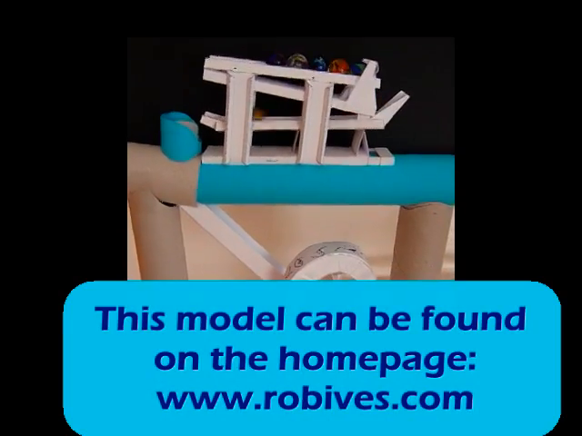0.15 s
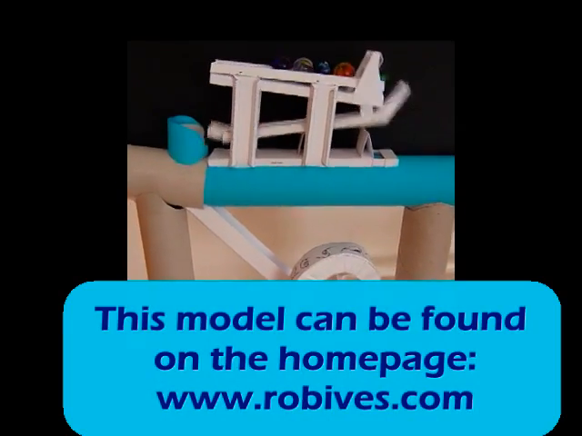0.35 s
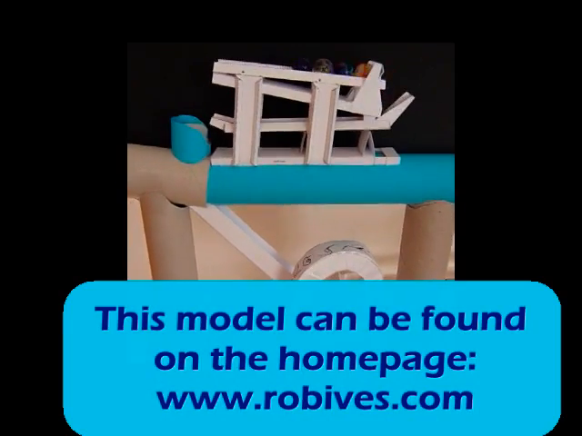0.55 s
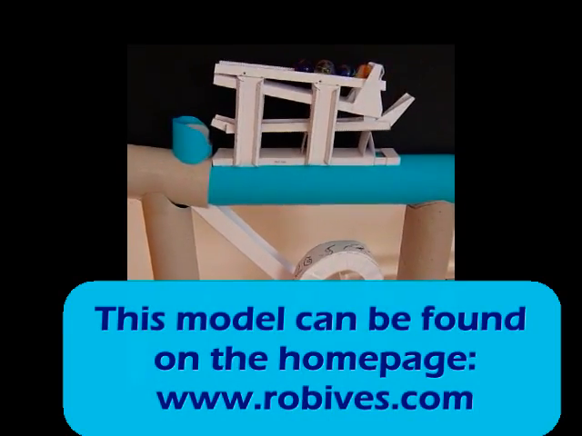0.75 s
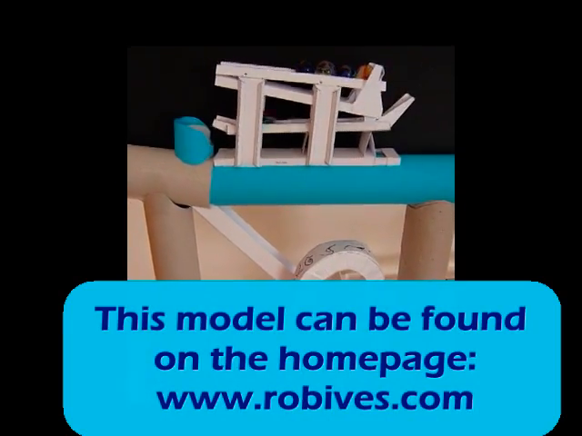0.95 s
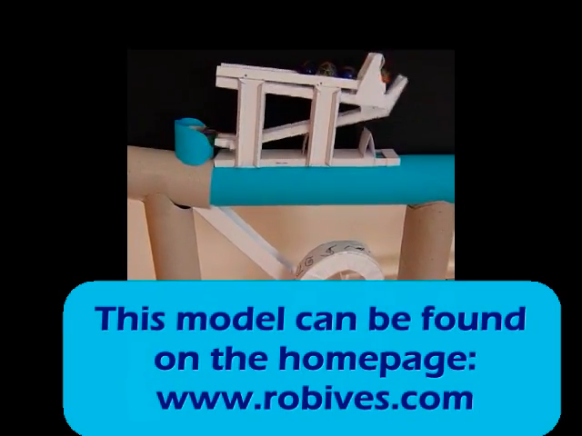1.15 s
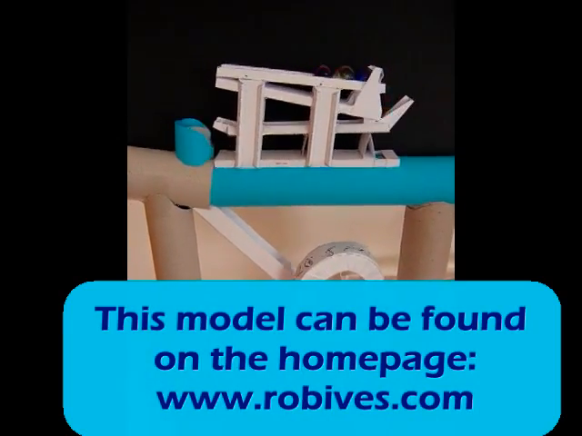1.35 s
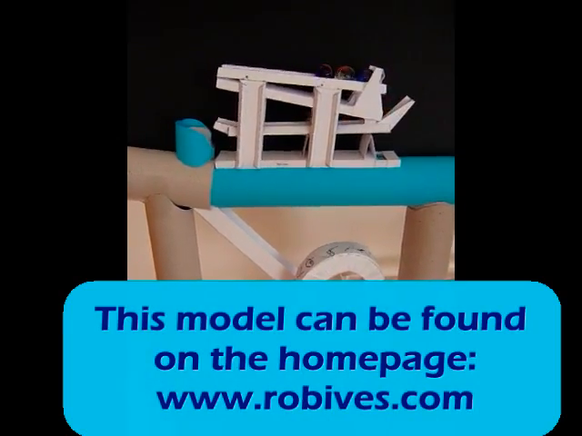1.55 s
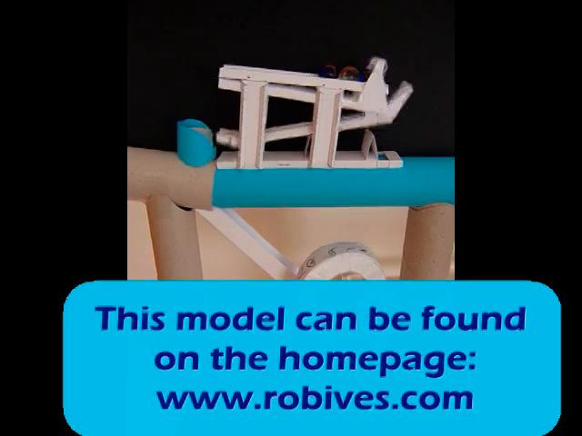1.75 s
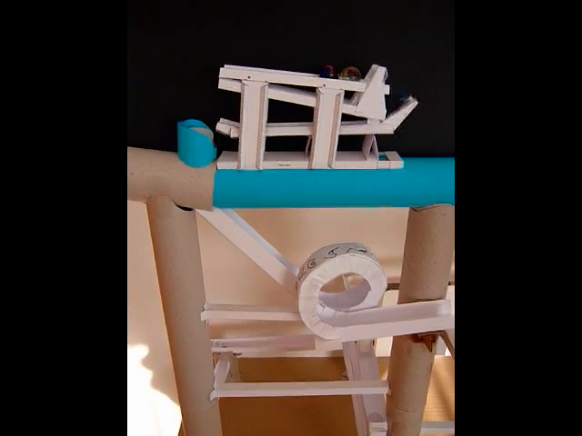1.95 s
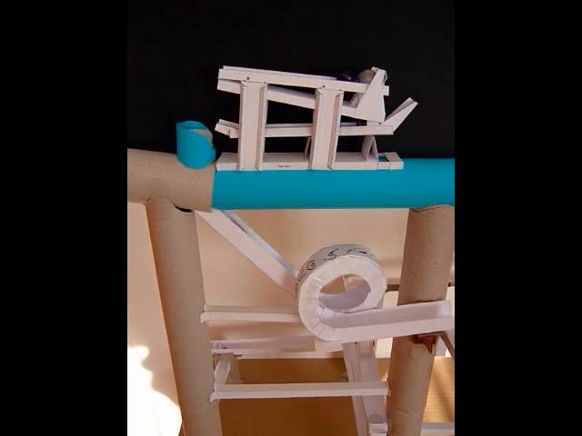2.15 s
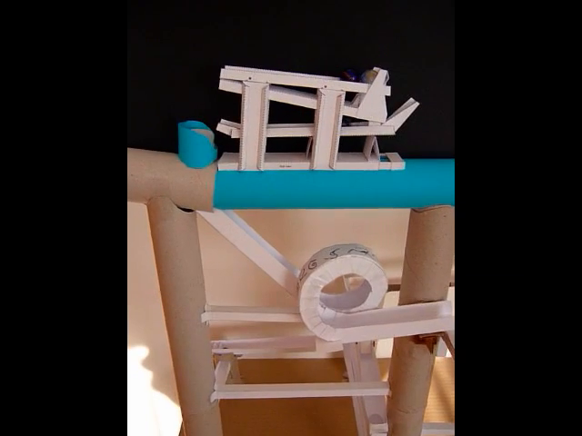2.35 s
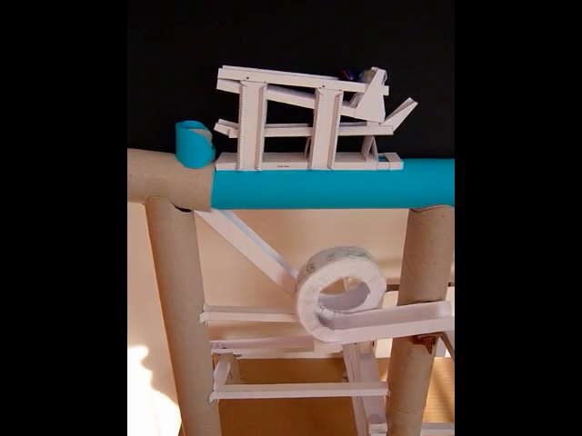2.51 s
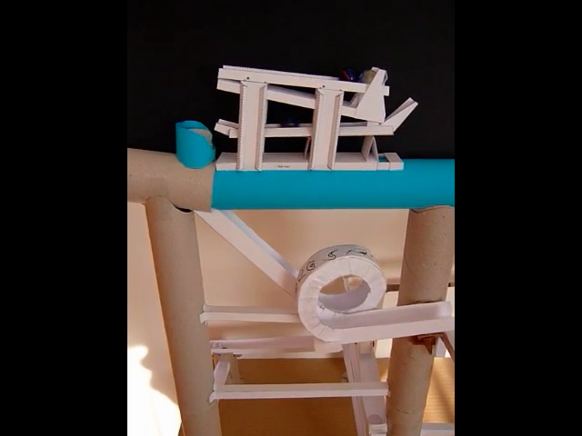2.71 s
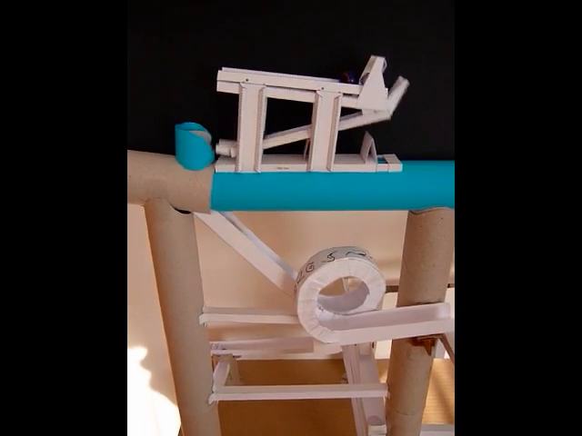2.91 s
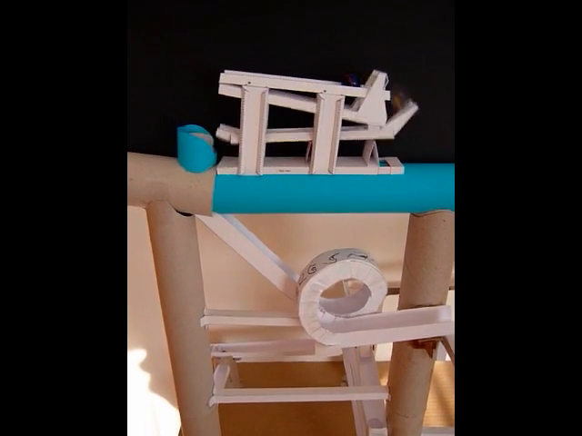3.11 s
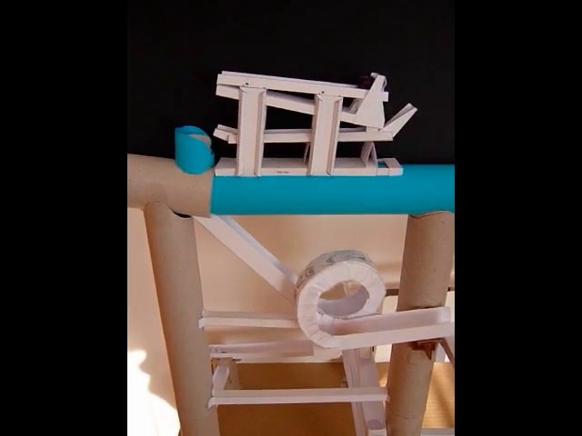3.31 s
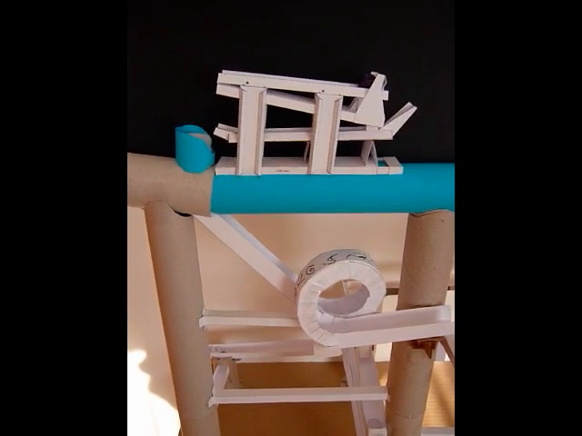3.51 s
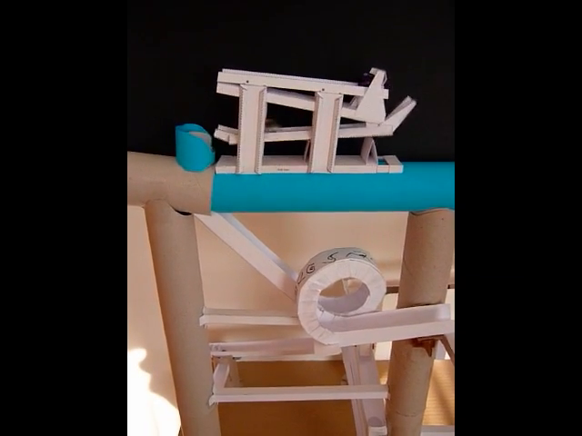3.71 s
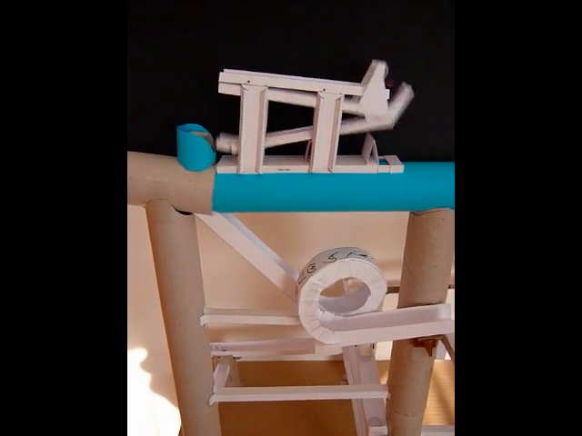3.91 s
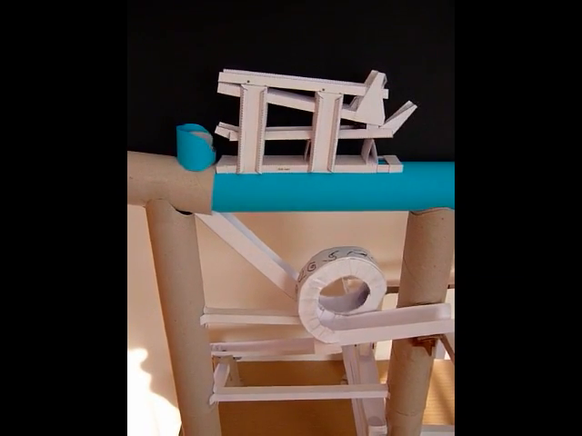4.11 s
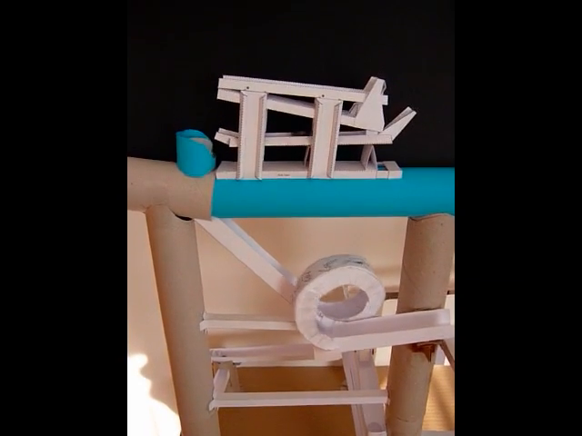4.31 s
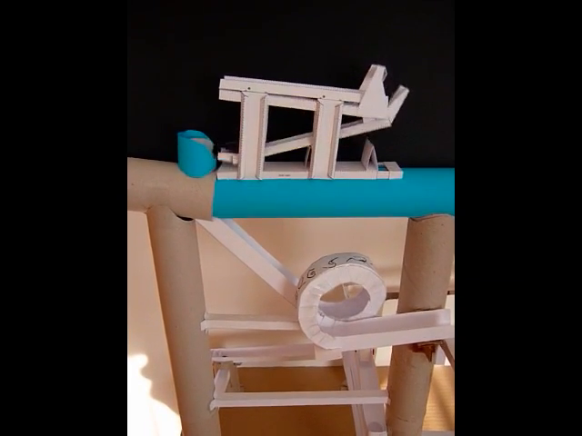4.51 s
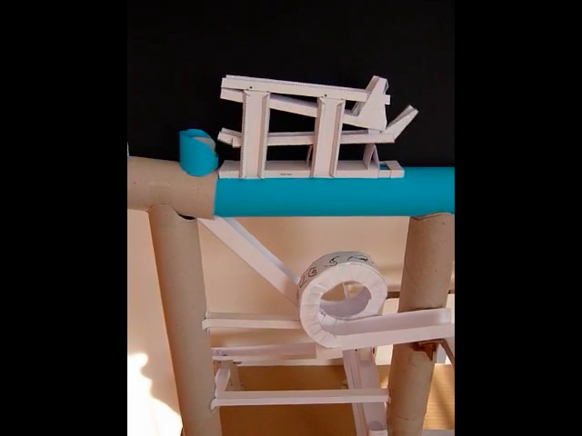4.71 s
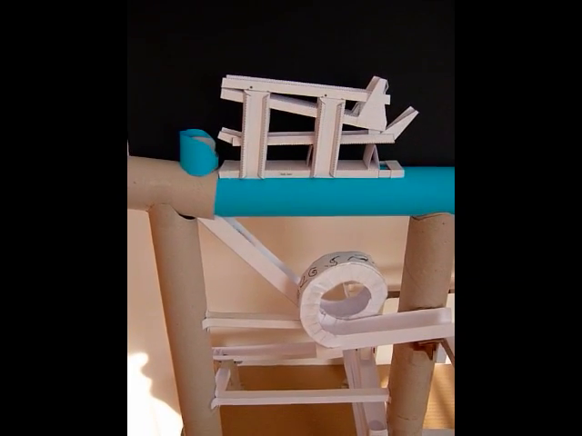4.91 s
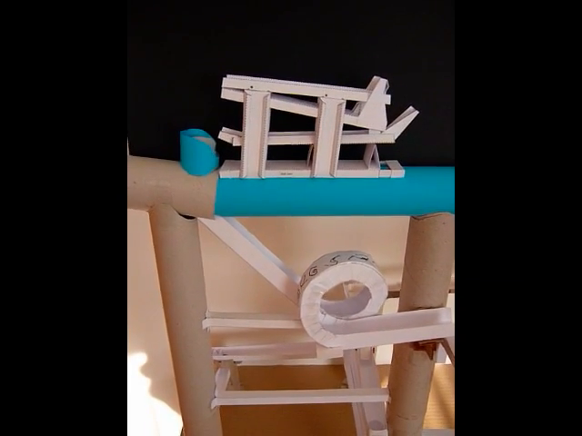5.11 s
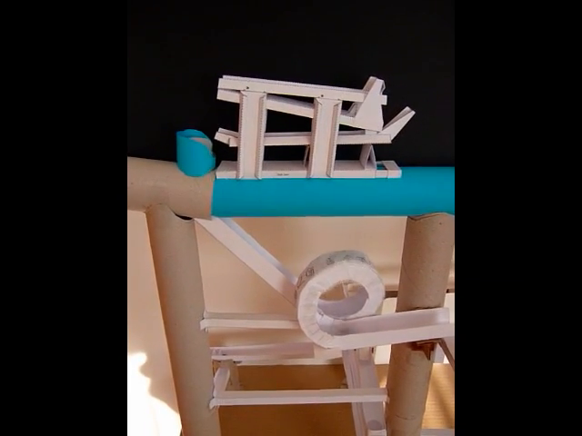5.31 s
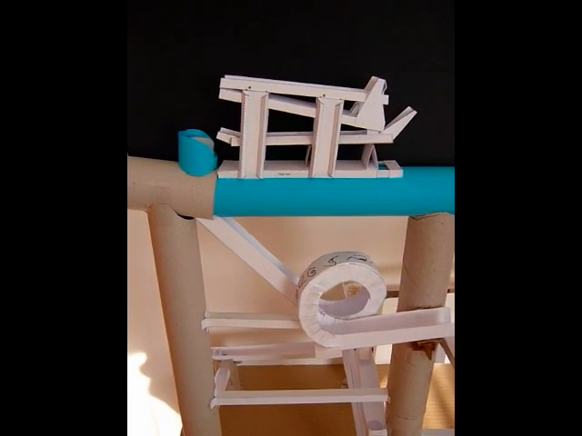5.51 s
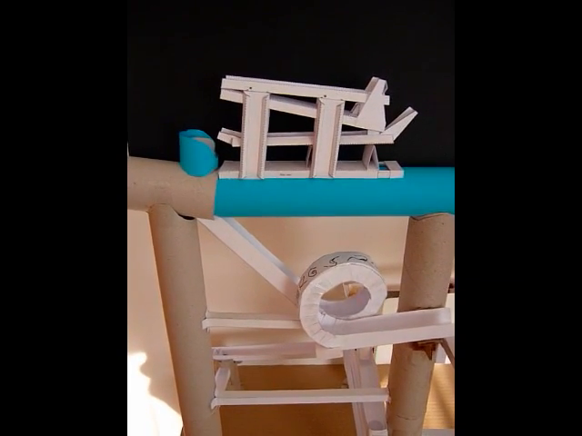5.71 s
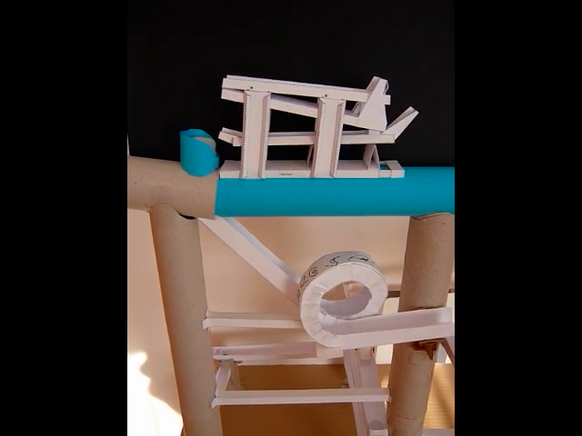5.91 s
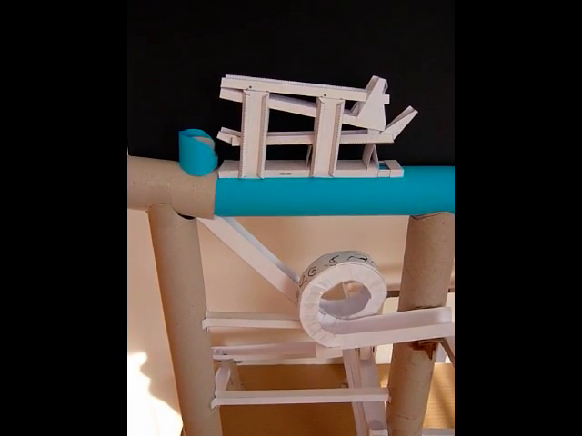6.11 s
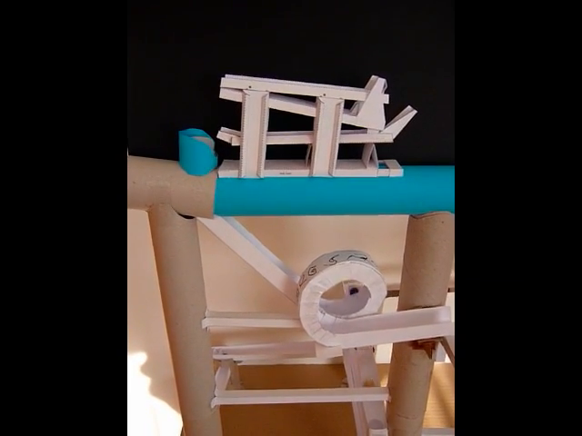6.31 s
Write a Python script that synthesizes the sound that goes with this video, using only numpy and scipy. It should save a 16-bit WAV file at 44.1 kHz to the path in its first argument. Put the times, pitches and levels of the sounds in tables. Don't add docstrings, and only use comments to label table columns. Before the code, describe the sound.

A dense, irregular patter of small dry impacts: marbles knocking a light seesaw arm, skidding into bends, clacking on stiff paper rails and bumping in hollow cardboard tubes. Hard slams and snaps stand out in the middle, with another thick cluster later, then thinning taps. Close, mostly mono pickup, short indoor echoes, soft background hiss and slightly rough digital treble.

```python
import sys
import numpy as np
from scipy import signal
from scipy.fft import rfft, irfft
from scipy.io import wavfile
from scipy.ndimage import uniform_filter1d

SR = 44100
rng = np.random.default_rng(int(sys.argv[2]) if len(sys.argv) > 2 else 0)


def master_out(mix):
    frames = np.transpose(np.atleast_2d(mix))
    ceiling = np.clip(frames, -1, 1)
    pcm = np.round(ceiling * 32767).astype(np.int16)
    wavfile.write(sys.argv[1], SR, pcm)


def makeup_ratio(level_db):
    decades = np.asarray(level_db, float) / 20
    return 10 ** decades


N = 280035


def evened(x):
    return x / np.sqrt(np.mean(x ** 2) + 1e-20)


def read(points, hz):
    f, value = np.transpose(points)
    return np.interp(np.log(hz + 1), np.log(f + 1), value)


def add(mix, s, sound):
    part = mix[..., round(s * SR):][..., :sound.shape[-1]]
    part += sound[..., :part.shape[-1]]


def colour(points, modes=()):
    hz = abs(np.fft.fftfreq(8192, 1 / SR))
    gain = makeup_ratio(np.maximum(read(points, hz), -90))
    lift = 1
    for mode_hz, width_hz, db in modes:
        lift = lift + 2.9 * makeup_ratio(db) / np.sqrt(1 + (2 * (hz - mode_hz) / width_hz) ** 2)
    log_spectrum = np.conj(signal.hilbert(np.log(gain * lift)))
    taps = np.fft.ifft(np.exp(log_spectrum)).real[:4096]
    return taps / np.linalg.norm(taps)


def ring(x, hz, width_hz):
    r = np.exp(-np.pi * width_hz / SR)
    return signal.lfilter([1, 0, -1], [1, -2 * r * np.cos(2 * np.pi * hz / SR), r * r], x)


def contacts(count, per_s, spread_db):
    chance, size, sign = rng.random((count, 3)).T
    size_db = spread_db * np.minimum(-np.log(size + 1e-9), 4)
    return evened((chance < per_s / SR) * makeup_ratio(size_db) * np.sign(sign - 0.5))


# (frequency [Hz], density [dB per Hz])
HUSH = [(20, -38), (60, -13), (120, 3.5), (220, 8.5), (700, 3), (1600, -2), (3000, -11), (6000, -15),
        (8000, -24), (10000, -29), (14000, -13.5)]
# (frequency [Hz], level [dB])
WHINES = [(7364, -76), (8635, -75)]


def hush():
    hz, t = np.fft.rfftfreq(N, 1 / SR), np.arange(N) / SR
    spectrum = rfft(rng.standard_normal(N)) * makeup_ratio(read(HUSH, hz))
    noise = makeup_ratio(-47.5) * evened(irfft(spectrum, N))
    for whine_hz, db in WHINES:
        noise = noise + np.sqrt(2) * makeup_ratio(db) * np.sin(2 * np.pi * whine_hz * t)
    return noise


# (frequency [Hz], 60 dB decay time [s])
ROOM = [(150, 0.7), (500, 0.33), (1500, 0.42), (4000, 0.043), (10000, 0.26)]


def room(x):
    taps = np.zeros(SR // 2)
    at = np.arange(200, len(taps) - 20, 20)
    taps[at + rng.integers(0, 20, len(at))] = rng.choice([-1., 1.], len(at))
    hz, t, z = signal.stft(taps, SR, nperseg=256)
    decay = makeup_ratio(-60 * t / read(ROOM, hz)[:, None])
    tail = signal.istft(z * decay, SR, nperseg=256)[1]
    return signal.fftconvolve(x, tail / np.linalg.norm(tail))[:N]


# (frequency [Hz], width [Hz], lift [dB])
BASE_MODES = [(221, 43, 3.7)]
# (frequency [Hz], level [dB])
BASE_COLOUR = [(40, -52), (70, -24), (110, -16.5), (170, -8), (240, -9.5), (300, -13), (600, -78)]
# (frequency [Hz], width [Hz], lift [dB])
TUBE_MODES = [(376, 35, 3.5), (511, 51, 10)]
# (frequency [Hz], level [dB])
TUBE_COLOUR = [(150, -32), (260, -23), (330, 2), (600, -10), (800, -12.5), (1200, -33), (2000, -119)]
# (frequency [Hz], density [dB per Hz])
PANEL_COLOUR = [(350, -31.5), (600, -3), (981, -3), (1290, -4.5), (1450, -1.5), (2070, -5.5), (2610, -5.5),
                (2820, -4), (4000, -9.5), (5200, -28), (8800, -120)]
# (frequency [Hz], density [dB per Hz])
PAPER_COLOUR = [(1880, -7), (3200, -19.5), (3620, -9.5), (4590, -1), (6190, -2.5), (8010, -16), (9860, -9),
                (10900, -12.5), (12200, -11.5), (12900, -11), (13800, -53)]


def bodies(drive):
    base = colour(BASE_COLOUR, BASE_MODES)
    tubes = colour(TUBE_COLOUR, TUBE_MODES)
    responses = np.array([base, tubes, colour(PANEL_COLOUR), colour(PAPER_COLOUR)])
    return signal.oaconvolve(drive, responses, axes=1)[:, :N].sum(0)


# (time [s], peak level [dB])
TICKS = [(0.307, -32), (0.419, -40), (0.8854, -36.5), (1.27, -33), (1.4543, -21), (1.8482, -16),
         (2.0787, -22), (2.782, -21), (3.0932, -26), (3.364, -14.5), (4.018, -24), (4.0437, -33),
         (4.3206, -32), (4.5928, -12.5), (4.8437, -16.5), (4.908, -28), (6.154, -26.5), (6.333, -15.5)]


def ticks():
    out, t = np.zeros(N), np.arange(600) / SR
    glass_hz, width_hz = 6900, 4500
    for s, db in TICKS:
        first = np.exp(-t / 0.0007)
        rebound = 1.6 * (t > 0.002) * np.exp(-t / 0.0016)
        touch = contacts(len(t), 12000, 2.1) * (first + rebound)
        bright = ring(ring(touch, glass_hz, width_hz), glass_hz, width_hz)
        add(out, s, makeup_ratio(db - 3.5) * bright / abs(bright).max())
    return out


# (start [s], length [s], panel level [dB], tube share [dB])
RUNS = [(0, 0.059, -47, 3), (.25, 0.12, -40.5, -6), (0.463, 0.067, -25.5, -9), (.76, 0.14, -71, -34),
        (1.062, 0.23, -36.5, -3.5), (1.198, 0.15, -30, -14), (1.365, 0.1, -37, 3.5),
        (1.477, 0.358, -36.5, -17), (1.938, .11, -23.5, -7), (2.12, 0.053, -35.5, 5.5),
        (2.242, 0.091, -33, -10), (2.514, 0.17, -37.5, -4), (2.742, 0.35, -33, -1.5),
        (3.08, 0.18, -32, -7.5), (3.28, 0.15, -32.5, 7.5), (3.515, 0.29, -42, 4), (3.818, 0.11, -50.5, 16),
        (3.943, 0.15, -29, 2), (4.164, 0.066, -50, 20.5), (4.302, 0.16, -37, -5), (4.5, 0.052, -37, 4.5),
        (4.573, 0.2, -30.5, -4), (4.863, 0.19, -33.5, -3.5), (5.054, 0.23, -50, 4),
        (5.25, 0.22, -40.5, 12.5), (5.315, 0.17, -33, 6), (5.545, 0.068, -60, 14), (5.668, 0.08, -35.5, -4),
        (5.768, 0.21, -41.5, 14), (6.09, 0.21, -35, -1.5)]


def rolling():
    t, power = np.arange(N) / SR, np.zeros((4, N))
    rise_s, fade_db_per_s = 0.032, 180
    for start, length, db, tube_db in RUNS:
        overrun_s = np.maximum(t - start - length, 0)
        shape = np.clip((t - start) / rise_s, 0, 1) * makeup_ratio(db - fade_db_per_s * overrun_s)
        base_db = -2 + 0.53 * tube_db
        paper_db = -11 - 0.1 * (db + 42) - 0.18 * tube_db
        shares = makeup_ratio(np.array([base_db, tube_db, 0, paper_db]))
        power += np.outer(shares ** 2, shape ** 2)
    slow = uniform_filter1d(uniform_filter1d(rng.standard_normal(N), 400), 400)
    lumps_db = 3.84 * evened(slow)
    return contacts(N, 6000, 4.2) * makeup_ratio(lumps_db - 5.5) * np.sqrt(power)


def land(drive, rows, panel_hz, ring_share, chatter_s):
    t = np.arange(4000) / SR
    for s, db, tube_db, paper_db in rows:
        hold = 1 / (1 + (t / max(chatter_s, 0.002)) ** 2.26)
        touch = contacts(len(t), 5000, 4.18)
        touch[2] = 3.8
        touch /= np.sqrt(np.sum((touch * hold) ** 2) / np.sum(hold ** 2))
        settle = 0.18 * np.exp(-t / 0.16)
        chatter = touch * (hold + settle)
        energy = np.linalg.norm(chatter)

        base = makeup_ratio(0.34 * tube_db - 3.0) * chatter
        thump = 0.7 * chatter + 0.7 * np.exp(-t / 0.00049)
        panel = ring(touch * hold, panel_hz, 40 + 0.12 * panel_hz)
        panel *= ring_share * energy / np.linalg.norm(panel)
        soft_hz = max(6500 * makeup_ratio(paper_db + 3.0), 700)
        body = signal.lfilter([1], [1, -np.exp(-2 * np.pi * soft_hz / SR)], chatter)
        body *= 0.55 * energy / np.linalg.norm(body)
        crisp = chatter * (1 + 1.1 * np.exp(-t / 0.0029))

        forces = np.array([base, makeup_ratio(tube_db) * thump, body + panel, makeup_ratio(paper_db) * crisp])
        add(drive, s, makeup_ratio(db - 15.0) * forces)


# (time [s], panel peak [dB], tube share [dB], surface share [dB])
KNOCKS = [(.267, -28.5, -17, -6), (.378, -13.5, 11, -21.5), (.482, -12.5, 7, -7.5), (.501, -15.5, -30, -7),
          (.599, -33, 3, -18), (.639, -45, -5, 9), (1.054, -31, 0, -9), (1.207, -32, -23, -19),
          (1.227, -17, 8, -10), (1.404, -16, 3, -32), (1.493, -33, -12, -1), (1.615, -20, -6, -10),
          (2.117, -11.5, -4, -18), (2.177, -15, 1, -11), (2.782, -15, -8, -8.5), (4.098, -23.5, -18, -10),
          (4.15, -11.5, 0, -14), (4.215, -22.5, -4, -13), (4.251, -26, -7, -31), (4.321, -22.5, 4.5, -3),
          (4.585, -16, -4, -9), (4.673, -10.5, 3, -8), (4.831, -10, 2.5, -15), (5.805, -25.5, -15, -11),
          (6.008, -12.5, 0, -7.5), (6.296, -41.5, 22, 2), (6.34, -31, -21, -7)]
# (time [s], panel peak [dB], tube share [dB], surface share [dB])
DROPS = [(.306, -34, -8, -12), (.809, -34.5, -13, -29), (.88, -41.5, -14, 4), (1.131, -32, 3, -6),
         (1.346, -11, 6.5, -11), (1.97, -14, -7, -13), (3.284, -12, -2, -9.5), (3.996, -22, -19, -31),
         (4.359, -32, 9, -18), (4.462, -24.5, -1, -12), (4.575, -21, -22, -20), (5.291, -15, -9, -9.5),
         (5.448, -20.5, 0, -19), (5.9, -29.5, -7, -22)]
# (time [s], panel peak [dB], tube share [dB], surface share [dB])
TAPS = [(.004, -30.5, 7, -17), (.037, -39, -8, 4), (.55, -13.5, 8, -6.5), (.822, -39, 4, -28),
        (1.457, -14, -9, -10.5), (1.939, -23, 5, -8), (2.04, -14, -25, -9), (3.089, -28, -8, -9),
        (3.798, -23, 11.5, -9), (4.022, -16.5, -18, -9), (4.535, -30, 9, -17), (5.335, -16, 9, -11),
        (5.36, -20, -11, -28), (5.412, -19.5, 6, -9.5), (5.476, -20.5, -9, -12), (5.94, -20.5, -16, -16.5),
        (6.124, -54, -1, -12), (6.152, -25, -1, -3), (6.242, -24.5, -19, -14)]
# (time [s], panel peak [dB], tube share [dB], surface share [dB])
CLACKS = [(.345, -27, -4, -10), (1.313, -15.5, -16, -11), (1.602, -24.5, 6, -2), (1.651, -17, -23, -8),
          (2.002, -24, -17, -12), (2.08, -10.5, 1, -10), (2.264, -10.5, -3, -10.5),
          (2.946, -7.5, -23, -11.5), (3, -21, -22, -14), (3.151, -9, 3.3, -11), (3.239, -28, -17, -1),
          (4.595, -7, -50, -12), (4.697, -6, -38, -17), (4.744, -9, -8, -15), (4.912, -10, -2, -11.5),
          (4.978, -17, -16, -10), (5.224, -15, -4.5, -11), (5.673, -37, -16, -21), (5.697, -15, -3, -10)]
# (time [s], panel peak [dB], tube share [dB], surface share [dB])
SNAPS = [
    (1.856, -7.5, -3, -11.5),
    (1.919, -11, -22, -9),
    (3.934, -16.5, 0.5, -14),
    (4.933, -12, 2.5, -14.5),
    (5.208, -19.5, -12, -13),
    (5.603, -11, -4, -9.5),
]
# (time [s], panel peak [dB], tube share [dB], surface share [dB])
SKIDS = [(.23, -34.5, -16, -4), (1.079, -37.5, -20, 1.5), (1.524, -28.5, -22, -2), (1.954, -16, -20, -7),
         (2.025, -18.5, -14, -13), (2.314, -34, -2, -4), (2.655, -38, 10, -18), (2.81, -19, 5, -8),
         (3.133, -16.5, -29, -18), (3.345, -17, -1, -10.5), (3.433, -23, -13, -8.5), (3.83, -26, 9.5, -11),
         (4.049, -14, 2, -8.5), (5.826, -16, 5, -12.5)]
# (time [s], panel peak [dB], tube share [dB], surface share [dB])
SLAMS = [
    (1.736, -7, -3.5, -9),
    (2.516, -20.5, 1, -4.5),
    (3.569, -7.5, -7, -10),
    (3.678, -13.5, -13, -11.5),
]
# (time [s], panel peak [dB], tube share [dB], surface share [dB])
CHINKS = [
    (.419, -14, -24, -10),
    (.443, -17, -12, -8),
    (1.27, -13, -8, -8.5),
    (1.29, -19, -5, -17),
    (3.197, -17.5, -13, -10.5),
    (3.973, -18, -3, -9),
    (5.734, -26, -6.5, -12),
]


def landings():
    drive = np.zeros((4, N))
    land(drive, KNOCKS, panel_hz=565, ring_share=0.54, chatter_s=0.012)
    land(drive, DROPS, panel_hz=487, ring_share=0.55, chatter_s=0.019)
    land(drive, TAPS, panel_hz=810, ring_share=0.21, chatter_s=0.014)
    land(drive, CLACKS, panel_hz=1690, ring_share=0.23, chatter_s=0.011)
    land(drive, SNAPS, panel_hz=2260, ring_share=0.34, chatter_s=0.011)
    land(drive, SKIDS, panel_hz=920, ring_share=0.26, chatter_s=0.04)
    land(drive, SLAMS, panel_hz=2770, ring_share=0.2, chatter_s=0.012)
    land(drive, CHINKS, panel_hz=3480, ring_share=0.43, chatter_s=0.015)
    return drive


def scene():
    track = bodies(landings() + rolling()) + ticks()
    return np.tile(track + makeup_ratio(-10.5) * room(track) + hush(), (2, 1))


def dip(x):
    power = uniform_filter1d(np.diff(x, prepend=0) ** 2, size=180)
    power_db = 10 * np.log10(abs(power) + 1e-12)
    rise_db = np.roll(power_db, -300) - power_db
    return x / makeup_ratio(uniform_filter1d(0.66 * np.maximum(rise_db - 9.0, 0), size=90))


def spectral_tiles(x):
    hz, t, z = signal.stft(x, SR, nperseg=1024, noverlap=768)
    band, frame = (hz // 500).astype(int), (t * SR // 1024).astype(int)
    step, hole, part = rng.random((frame[-1] + 1, band[-1] + 2, 3)).T

    treble_db = 10 * np.log10((abs(z[hz > 6000]) ** 2).sum(0) + 1e-12)
    held_db = np.maximum.reduceat(treble_db, np.flatnonzero(np.diff(frame, prepend=-1)))
    loud_db = 0.68 * held_db + 0.4 * uniform_filter1d(held_db, size=3)
    ceiling_hz = np.minimum(10300 + 130 * (loud_db + 66.0), 13900)
    below = 500 * band[:, None] < ceiling_hz[frame]
    whole = (hole > 0.012)[band][:, frame] | (hz < 4200)[:, None]
    z = z * (below * whole) * makeup_ratio(5.9 * (step - 0.5))[band][:, frame]

    wide = (part[-1] < 0.045) & (np.arange(len(part)) > 8)[:, None]
    stray = uniform_filter1d(1. * (part < 0.016), size=2, axis=1) * 2
    parted = makeup_ratio(-5.5) * stray + makeup_ratio(-12) * wide
    phase = np.exp(2j * np.pi * rng.random(z.shape))
    side = abs(z) * parted[band][:, frame] * (hz > 500)[:, None] * phase
    return signal.istft(np.array([z + side, z - side]), SR, nperseg=1024, noverlap=768)[1][:, :N]


def band_limit(x):
    return signal.sosfilt(signal.butter(12, 14000, fs=SR, output="sos"), x)


def record(dry):
    offset = -0.0644
    mix = spectral_tiles(dip(dry[0])) + offset
    return band_limit(mix)


dry = scene()
out = record(dry)
master_out(out)
```